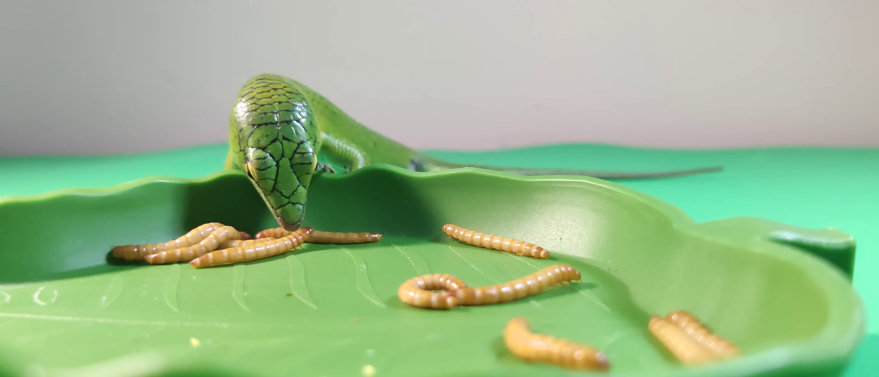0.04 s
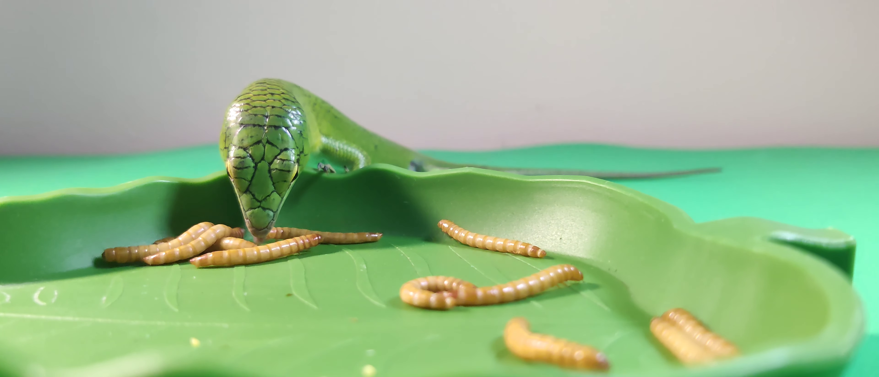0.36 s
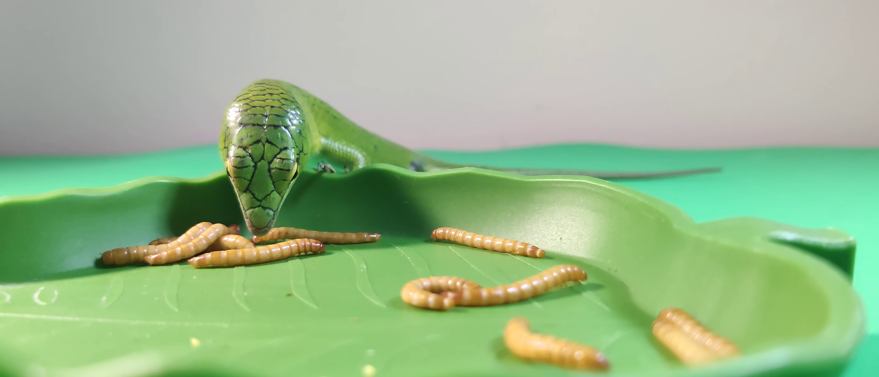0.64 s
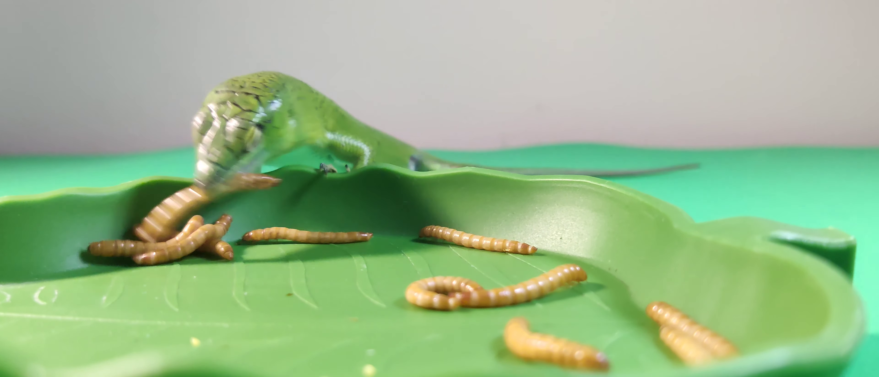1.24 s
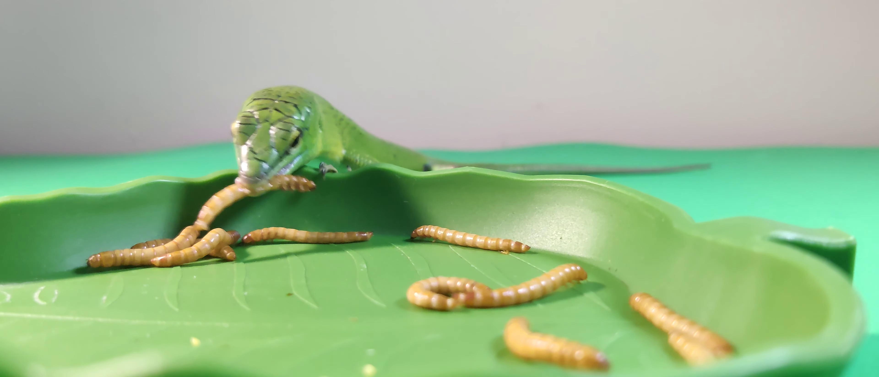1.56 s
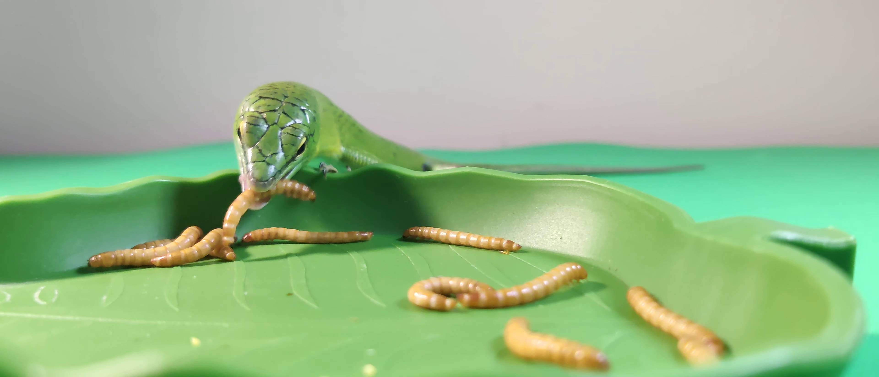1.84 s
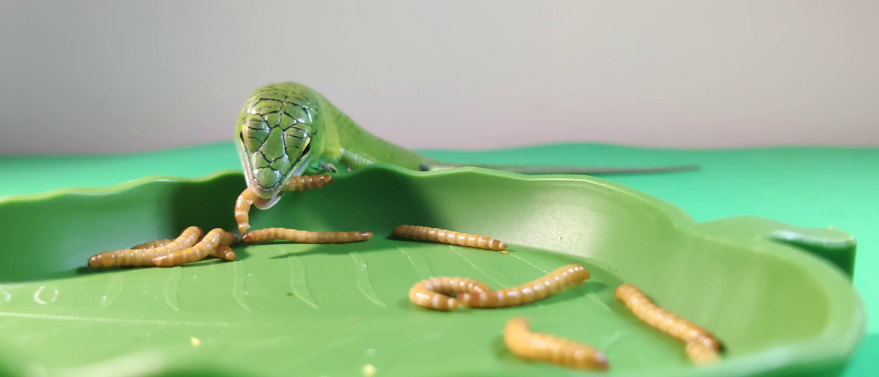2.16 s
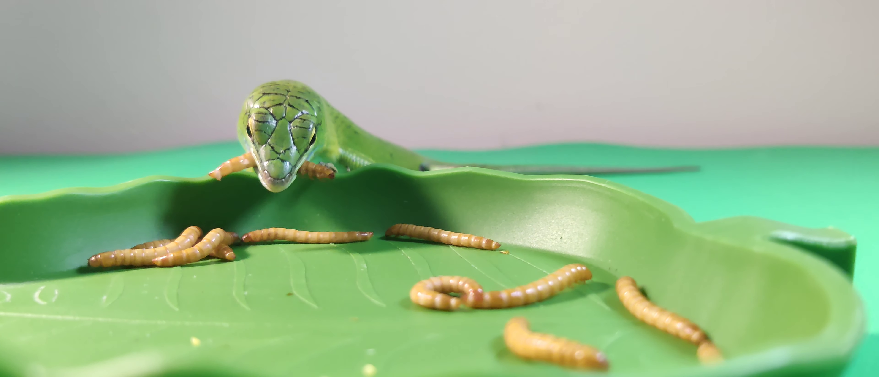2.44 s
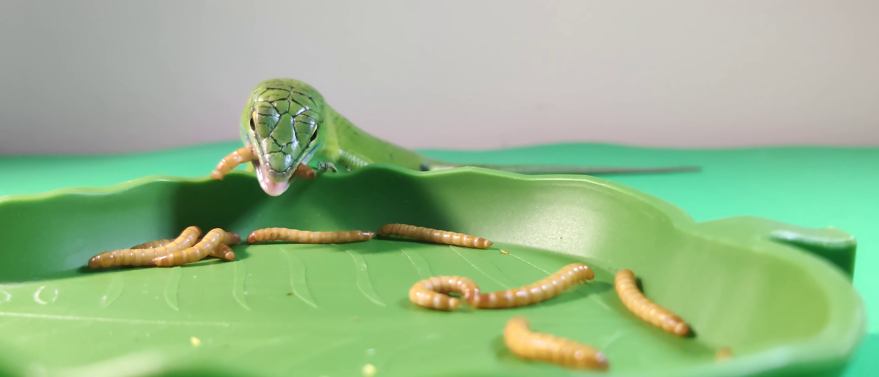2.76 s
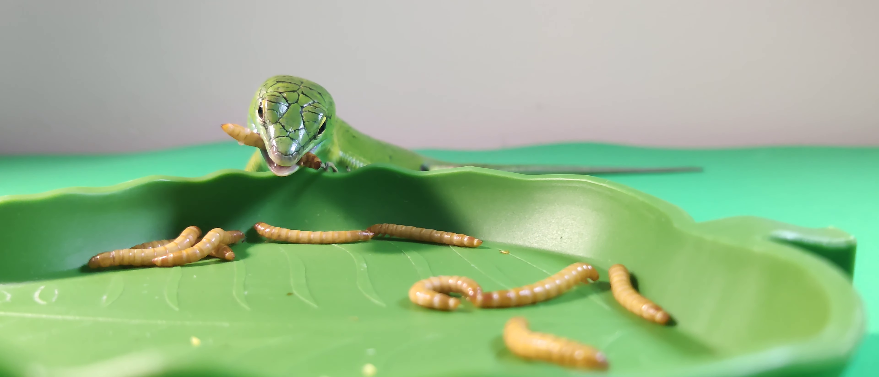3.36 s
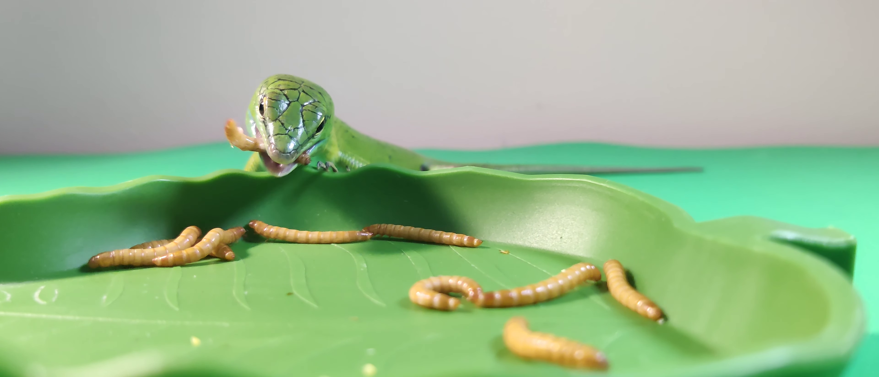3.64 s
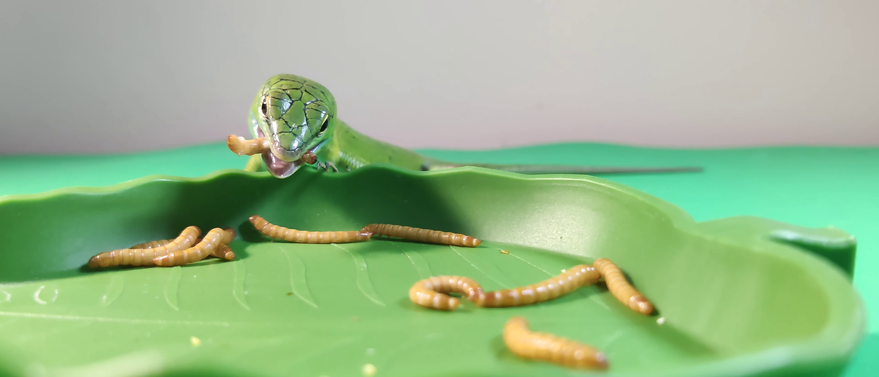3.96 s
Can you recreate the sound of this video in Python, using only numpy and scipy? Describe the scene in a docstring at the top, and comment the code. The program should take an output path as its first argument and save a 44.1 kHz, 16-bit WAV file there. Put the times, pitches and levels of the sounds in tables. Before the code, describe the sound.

Crisp little crunches of a lizard chewing, with soft hiss and a far-off engine drone.

```python
"""A distant engine drones and slows down outside a quiet room, over a steady hiss and a deep hum.
Its tones are harmonics of a falling cycle rate. Close to a stereo microphone, mealworms rustle faintly
as their dry shells rub; then a small lizard picks one out of a plastic dish and chews it.
Each bite is a cluster of tiny shell fractures, impulses that excite a sharp treble ring.
The hardest bites add a dull knock, and the walls return a short tail."""
import sys
import numpy as np
from scipy import signal
from scipy.fft import rfft, irfft
from scipy.io import wavfile

SR = 44100
rng = np.random.default_rng(int(sys.argv[2]) if len(sys.argv) > 2 else 0)


def dump(signal):
    """Clip the signal to [-1, 1] and save it as 16-bit WAV at the path in sys.argv[1]."""
    limited = np.clip(np.atleast_2d(signal).T, -1, 1)
    pcm = np.round(limited * 32767).astype(np.int16)
    wavfile.write(sys.argv[1], SR, pcm)


N = 176400
TIME, FREQ = np.arange(N) / SR, np.fft.rfftfreq(N, 1 / SR)

# cycle rate of the engine [t/s, f/Hz]
ENGINE_SPEED = [(0, 13.55), (.5, 13.45), (.9, 13.2), (1.1, 12.72), (1.42, 12.82), (1.8, 12.5),
                (2.07, 12.42), (2.2, 11.6), (2.35, 10.7), (2.7, 10.35), (3, 9.95), (3.33, 9.85),
                (3.55, 9.35), (3.75, 8.6), (4, 8.4)]
# strong orders, or harmonics of that rate [t/s, 5th level/dB, 8th level/dB, 13th level/dB]
STRONG_ORDERS = [(0, -69, -54, -80), (.3, -52, -49.5, -73), (.48, -46, -87, -60.5), (.58, -45, -57, -62),
                 (.72, -42.5, -48, -84), (.92, -42, -47.5, -61), (1.1, -41.5, -44, -51.5),
                 (1.45, -43.5, -42.5, -53), (1.75, -54, -45, -53.5), (2.02, -46.5, -51, -57.5),
                 (2.2, -52, -51.5, -68), (2.38, -37, -45.5, -60.5), (2.65, -40.5, -41.5, -62),
                 (2.92, -37.5, -40, -61), (3.08, -55, -47.5, -61), (3.3, -42, -41.5, -72),
                 (3.48, -41, -67, -70), (3.72, -53.5, -58, -100), (4, -64, -62, -81)]
# the 6th order, which fades early [t/s, level/dB]
SIXTH_ORDER = [(0, -65), (.5, -54), (1.1, -54.5), (1.45, -69), (2.2, -63.5), (4, -75)]
# weaker orders [multiple, level/dB re the roar]
WEAK_ORDERS = [(4, 3), (7, -13), (9, -12.5), (11, -12), (15, -18.5), (16, -14.5)]
# upper orders [multiple, level/dB re the 13th]
UPPER_ORDERS = [(21, -22.5), (23, -26), (24, -24), (36, -27)]
# the engine's faint whine [t/s, f/Hz, level/dB]
WHINE_TRACK = [(0, 408, -76), (.35, 411, -70), (.7, 408.3, -77), (.85, 403, -69.5), (1.1, 396.4, -69),
               (1.5, 395, -65.5), (1.78, 388, -77.5), (2.03, 385, -65.5), (2.3, 356, -96), (4, 279.1, -89)]
# envelope of the engine's roar [t/s, level/dB]
ROAR_LEVEL = [(0, -61), (.5, -58.5), (1.0, -57.5), (1.45, -56.5), (1.7, -61), (2.05, -61), (2.4, -64),
              (3.0, -64), (3.5, -64.5), (4, -72.5)]
# spectral density of the roar [f/Hz, relative level/dB]
ROAR_SPECTRUM = [(20, 3), (60, 8.5), (150, 8), (230, -2.5), (330, -3), (480, -2), (800, -2.5),
                 (1100, -12.5), (1800, -14.5), (3000, -21.5), (6000, -32), (16000, -56)]
# strongest room resonances [f/Hz, lift/dB]
ROOM_MODES = [(458, 2.5), (560, 5.5), (651, 4.5), (717, 4), (752, 2), (818, 4)]
# likeness of the noise in the two channels [f/Hz, correlation]
CORRELATION = [(20, 1), (130, 0.92), (350, 0.58), (700, 0.13), (1400, -0.2), (3000, 0.04), (16000, -0.026)]
# partials of the deep hum [f/Hz, level/dB]
HUM_PARTIALS = [(16.7, -46), (29.7, -52)]
# spectral density of the hiss [f/Hz, relative level/dB]
HISS_SPECTRUM = [(20, 21), (70, 31.5), (200, 21), (400, 6), (800, 7), (1100, 10.5), (1850, 6.5), (2400, 4),
                 (4500, 2.5), (8000, -0.5), (11500, 0.5), (14000, 3.5), (16000, -2.5)]
# envelope of a soft midrange wash [t/s, level/dB]
WASH_LEVEL = [(0, -70.5), (.3, -74), (.68, -68.5), (.95, -80), (1.1, -79), (1.45, -74), (1.56, -81),
              (1.7, -89), (4, -87)]
# spectral density of the wash [f/Hz, relative level/dB]
WASH_SPECTRUM = [(20, -15), (400, -4), (760, -11.5), (1100, -1.5), (1800, 1), (2600, -14.5), (6000, -19),
                 (16000, -30)]
# narrow swells in the roar [peak t/s, Gaussian width/s, centre f/Hz, level/dB]
ROAR_SWELLS = [(0.302, 0.065, 600, -69.5), (1.54, 0.04, 740, -65.5), (2.02, .06, 643, -73.5)]
# rustles of worms and jaws [peak t/s, Gaussian width/s, relative level/dB]
RUSTLES = [(0.503, 0.17, -89), (1.213, 0.051, -77.5), (1.326, 0.025, -77.5), (1.416, 0.032, -73),
           (1.685, 0.017, -79), (1.976, 0.025, -80.5), (2.064, 0.034, -81), (2.909, 0.012, -68.5),
           (3.344, 0.01, -70), (3.808, 0.02, -77)]
# spectral density of rubbing shells [f/Hz, relative level/dB]
SCRAPE_SPECTRUM = [(1000, -28), (3000, -2), (5500, -5.5), (8000, 1), (10000, -4), (16000, -15)]
# modes of the treble ring in each channel [f/Hz, T60/s, relative level/dB]
LEFT_MODES = [(8200, 0.0061, -13), (12500, 0.0056, -34)]
RIGHT_MODES = [(5940, 0.023, -28.5), (6536, 0.0082, 0), (12840, 0.005, -24)]
# shell fractures [t/s, snap level/dB, hump f/Hz, body level/dB re the hump, ring gain/dB,
# snap left minus right/dB]
SHELL_CRACKS = [(1.3300, -50, 11860, -9, -52, -4), (1.338, -39, 12300, -13, -38, -5),
                (1.3418, -37, 13000, -3, -34.5, -6), (1.3445, -46, 10000, -8, -49, -4),
                (1.3663, -44, 5200, -22, -56, -15), (1.3665, -30, 9400, -24, -49, 6),
                (1.3688, -48, 9500, -8, -41, 4), (1.3772, -46, 9000, -10, -62, 8),
                (1.4027, -41, 3900, -3, -56, -9), (1.4144, -51, 7000, -8, -36.5, -6),
                (1.8046, -42.5, 3100, -14, -60, -9), (1.8051, -50, 5570, -12, -60, -13),
                (1.9813, -48, 7000, 1, -43, -4), (2.0358, -53, 7000, -2, -48, -5),
                (2.045, -41, 10000, -5, -47, 2), (2.0496, -39.5, 4500, -1, -42, -10),
                (2.063, -39, 5300, -7, -29, -7), (2.0646, -45, 8000, -8, -40, -1),
                (2.0731, -42, 8000, -14, -35, 3), (2.075, -48, 7000, -8, -23, -6),
                (2.4957, -48, 13400, -16, -48, -5), (2.5005, -63, 11900, -8, -41, -7),
                (2.5054, -31.5, 14900, -10, -33, -13), (2.5083, -37, 13200, -5, -54, 4),
                (2.5165, -51, 13500, -12, -50, -2), (2.8833, -47, 13650, -4, -54, -6),
                (2.8966, -34, 15000, -4, -44, -11), (2.8985, -42, 14000, -14, -54, 6),
                (2.9008, -49, 13000, -10, -46, -6), (2.904, -43, 14000, -14, -48, -3),
                (2.908, -48, 14000, -14, -50, -2), (2.9156, -38.5, 10800, -20, -48, 21),
                (2.9137, -31.5, 12400, -17, -24.5, -15), (2.916, -45, 12000, -14, -35, 3),
                (3.0246, -46.5, 3460, -13, -62, -1), (3.3212, -56, 8740, -6, -50, -4),
                (3.329, -45, 14000, 1, -51, -11), (3.3382, -52, 14000, -12, -54, -6),
                (3.3438, -48, 12500, -7, -48, -1), (3.3472, -45, 8500, 7, -31.5, -14),
                (3.3482, -53, 9000, -4, -31, 4), (3.3511, -44, 11500, -10, -44, 0),
                (3.7696, -51, 7950, -5, -43, 0), (3.7750, -41, 3800, 0, -41, -3),
                (3.7833, -51, 12000, -4, -42, 0), (3.7932, -49, 8150, -10, -43, -6),
                (3.7996, -38, 7600, -10, -19.5, -11), (3.802, -37, 8000, -7, -36, -6),
                (3.8036, -47, 7980, -8, -33, -11), (3.8094, -38, 9500, -10, -34, 4)]
# knocks under the hardest cracks [t/s, level/dB, left minus right/dB]
BITE_KNOCKS = [(2.5054, -41.5, 2), (2.8966, -41, -2), (2.9140, -42, -2), (3.3475, -46, 0),
               (3.8020, -40, -2), (3.8094, -40, 1)]

BAND_EDGE_HZ = 15700


def amp(db):
    """Amplitude grows tenfold with every 20 dB."""
    return 10 ** (np.asarray(db) / 20)


def unit_rms(x):
    """Normalisation to a mean power of 1."""
    return x / np.sqrt(np.mean(x ** 2) + 1e-20)


def unit_energy(x):
    """Normalisation of each channel to an energy of 1."""
    return x / np.sqrt(np.sum(x ** 2, -1, keepdims=True) + 1e-20)


def bell(offset, width):
    """A Gaussian of height 1; width is its standard deviation."""
    return np.exp(-.5 * (offset / width) ** 2)


def decay(t, t60):
    """Exponential damping, 60 dB in t60 seconds."""
    return np.exp(-np.log(1000) * t / t60)


def spectrum(points):
    """Interpolation of a spectrum on a logarithmic frequency axis."""
    hz, value = np.transpose(points)
    return np.interp(np.log(FREQ + 1), np.log(hz + 1), value)


def curve(rows, column=1):
    """Linear interpolation of one column of a time table."""
    rows = np.array(rows)
    return np.interp(TIME, rows[:, 0], rows[:, column])


def waver(rate_hz):
    """Low-pass filtering turns white noise into a smooth random motion of rms 1."""
    return unit_rms(irfft(rfft(rng.standard_normal(N)) * np.exp(-(FREQ / rate_hz) ** 2), N))


def add(mix, start_s, sound, pan_db=0):
    """Superposition of a stereo sound; a level difference, left minus right, places it."""
    part = mix[:, round(start_s * SR):][:, :sound.shape[1]]
    part += amp([[pan_db / 2], [-pan_db / 2]]) * sound[:, :part.shape[1]]


def partial(phase, db, spread_rad=.18):
    """A sinusoid reaches the two channels with a small phase difference."""
    offset = 2 * np.pi * rng.random() + spread_rad * rng.choice([-1, 1]) * np.array([[1], [-1]])
    return np.sqrt(2) * amp(db) * np.sin(phase + offset)


def engine(waver_db=3, boom_hz=160.4, boom_db=12.5):
    """A periodic source sounds harmonics that sink as it slows, here with a faint whine and dull roar."""
    cycle_hz, roar_db = curve(ENGINE_SPEED), curve(ROAR_LEVEL)
    fifth, eighth, thirteenth = (curve(STRONG_ORDERS, column) for column in (1, 2, 3))
    orders = [(5, fifth), (6, curve(SIXTH_ORDER)), (8, eighth), (13, thirteenth)]
    for k, db in WEAK_ORDERS:
        lift_db = boom_db * bell(k * cycle_hz - boom_hz, 6.7)  # on sinking through a room resonance
        orders.append((k, roar_db + db + lift_db + waver_db * waver(rate_hz=3.5)))
    orders += [(k, thirteenth + db + waver_db * waver(rate_hz=4.8)) for k, db in UPPER_ORDERS]
    cycle_phase = 2 * np.pi * np.cumsum(cycle_hz) / SR
    drone = sum(partial(k * cycle_phase, db) for k, db in orders)
    whine_phase = 2 * np.pi * np.cumsum(curve(WHINE_TRACK)) / SR
    whine = partial(whine_phase, curve(WHINE_TRACK, 2) + waver_db * waver(rate_hz=34))
    return drone * amp([[-.4], [.4]]) + whine + amp(roar_db) * room_noise(ROAR_SPECTRUM)


def room_noise(colour, ripple_db=3, ripple_step_hz=14, ripple_top_hz=1660, mode_width_hz=8):
    """Room resonances ripple the low end of a noise whose channels are correlated in the bass."""
    ripple = np.interp(FREQ / ripple_step_hz, np.arange(len(FREQ)), rng.standard_normal(len(FREQ)))
    ripple *= np.minimum(FREQ / 300, 1) / (1 + (FREQ / ripple_top_hz) ** 2)
    modes_db = sum(db * bell(FREQ - hz, mode_width_hz) for hz, db in ROOM_MODES)
    gain = amp(spectrum(colour) + ripple_db * ripple + modes_db)
    left, independent = rfft(rng.standard_normal((2, N)))
    correlation = np.clip(spectrum(CORRELATION), -1, 1)
    right = correlation * left + np.sqrt(1 - correlation ** 2) * independent
    return unit_rms(irfft(np.array([left, right]) * gain, N))


def background(hiss_db=-65):
    """A deep hum, a steady hiss and a fading midrange wash add by superposition."""
    hum = sum(np.sqrt(2) * amp(db) * np.sin(2 * np.pi * (hz * TIME + rng.random()))
              for hz, db in HUM_PARTIALS)
    hiss = amp(hiss_db) * room_noise(HISS_SPECTRUM)
    wash = amp(curve(WASH_LEVEL)) * room_noise(WASH_SPECTRUM)
    return hum + hiss + wash


def swells(width_hz=40):
    """Noise confined to a narrow band has a pitch, so the roar seems to ring briefly."""
    out = np.zeros(N)
    for peak_s, width_s, hz, db in ROAR_SWELLS:
        band = irfft(rfft(rng.standard_normal(N)) * bell(FREQ - hz, width_hz), N)
        out += amp(db) * bell(TIME - peak_s, width_s) * unit_rms(band)
    return out


def rustle(ticks_per_s=2100, clump_db=3, scrape_db=6, ring_db=6.5):
    """Friction between dry shells releases tiny impulses in uneven clumps, which excite the ring."""
    envelope = sum(amp(db) * bell(TIME - peak_s, width_s) for peak_s, width_s, db in RUSTLES)
    clumps = amp(clump_db * waver(rate_hz=69))
    ticks = unit_rms(clumps * rng.standard_normal((2, N)) * (rng.random(N) < ticks_per_s / SR))
    scrape = unit_rms(irfft(rfft(ticks) * amp(spectrum(SCRAPE_SPECTRUM)), N))
    ringing = signal.oaconvolve(ticks, ring(), axes=1)[:, :N]
    return envelope * (amp(scrape_db) * scrape + amp(ring_db) * ringing)


def ring(detune=1, rise_s=.00028, size=1024):
    """Free vibration after an impulse is a sum of damped modes, different in each channel."""
    t, out = np.arange(size) / SR, np.zeros((2, size))
    rise = 1 - np.exp(-t / rise_s)
    for side, modes in enumerate((LEFT_MODES, RIGHT_MODES)):
        for hz, t60, db in modes:
            out[side] += amp(db) * unit_energy(np.sin(2 * np.pi * hz * detune * t) * decay(t, t60) * rise)
    return out


def snap(centre_hz, body_db, octaves=.34, low_cut_hz=1970, echo_db=-30, size=1024):
    """Brittle fracture radiates a bright impulse trailed by splinters; the dish reflects it."""
    t, signed_hz = np.arange(size) / SR, np.fft.fftfreq(size, 1 / SR)
    hz = abs(signed_hz) + 1
    gain = bell(np.log2(hz / centre_hz), octaves) + amp(body_db)  # a hump over a flat body
    gain /= (1 + (low_cut_hz / hz) ** 2) * np.sqrt(1 + (hz / BAND_EDGE_HZ) ** 20)
    colour = np.exp(np.conj(signal.hilbert(np.log(gain + 1e-4))))  # minimum phase keeps the onset sharp
    drive = unit_energy(rng.standard_normal((2, size)) * decay(t, t60=.008))  # splinters
    drive[:, 0] += 1  # the fracture itself
    delay_s = rng.uniform(.000042, .00079, (2, 1))
    echo = 1 + amp(echo_db) * np.exp(-2j * np.pi * signed_hz * delay_s)
    return unit_energy(np.fft.ifft(np.fft.fft(drive) * colour * echo).real)


def bites(scatter=.04):
    """Impulse excitation: each crack gives a snap and a slightly detuned ring, returned apart."""
    snaps, rings = np.zeros((2, 2, N))
    for start_s, snap_db, centre_hz, body_db, ring_db, pan_db in SHELL_CRACKS:
        add(snaps, start_s, amp(snap_db) * snap(centre_hz, body_db), pan_db)
        add(rings, start_s, amp(ring_db) * ring(detune=1 + rng.uniform(-scatter, scatter)))
    return snaps, rings


def reverberation(sound, db=-13, rise_s=.0027):
    """Dense reflections from the walls merge into a faint, exponentially decaying tail."""
    t = np.arange(SR // 3) / SR
    tail = rng.standard_normal((2, len(t))) * decay(t, t60=.16) * np.minimum(t / rise_s, 1)
    return amp(db) * signal.oaconvolve(sound.mean(0)[None], unit_energy(tail), axes=1)[:, :N]


def knocks(centre_hz=1800, octaves=.42, size=2048):
    """A heavily damped band of noise is heard as a dull knock under the hardest bites."""
    t, hz, out = np.arange(size) / SR, np.fft.rfftfreq(size, 1 / SR) + 1, np.zeros((2, N))
    band = bell(np.log2(hz / centre_hz), octaves)
    for start_s, db, pan_db in BITE_KNOCKS:
        knock = irfft(rfft(rng.standard_normal((2, size))) * band) * decay(t, t60=.02)
        add(out, start_s, amp(db) * unit_energy(knock), pan_db)
    return out


def scene():
    """Sound pressures add: the far engine, the background and the lizard feeding in its room."""
    snaps, rings = bites()
    impacts = snaps + knocks()
    tail = reverberation(impacts + amp(-2.5) * rings)  # the walls return less of the ring
    return engine() + background() + swells() + rustle() + impacts + rings + tail


def record(dry):
    """A linear-phase low-pass filter limits the bandwidth."""
    low_pass = signal.firwin(161, BAND_EDGE_HZ, window=("kaiser", 9), fs=SR)
    return signal.oaconvolve(dry, low_pass[None], "same")


dry = scene()
out = record(dry)
dump(out)
```